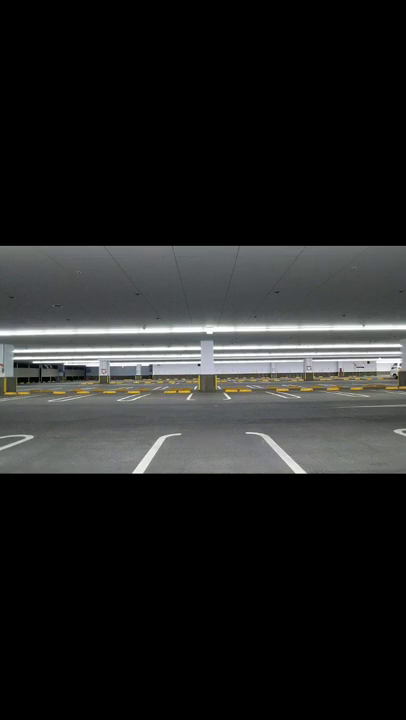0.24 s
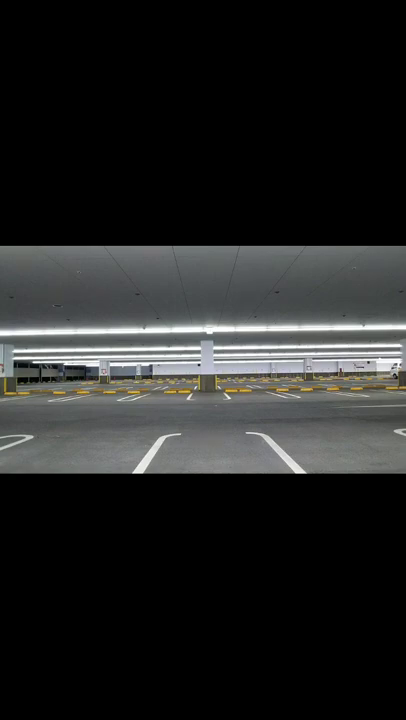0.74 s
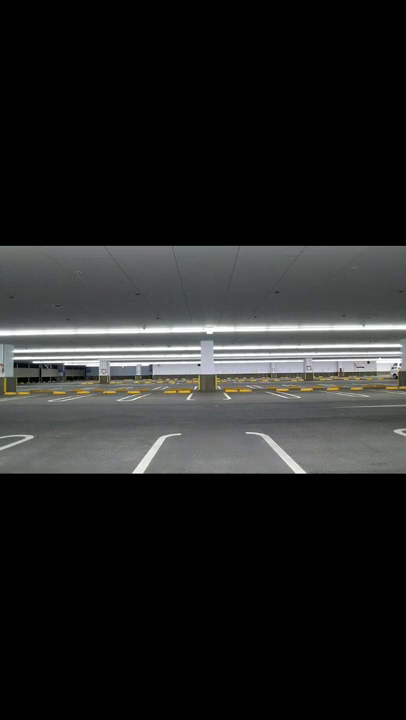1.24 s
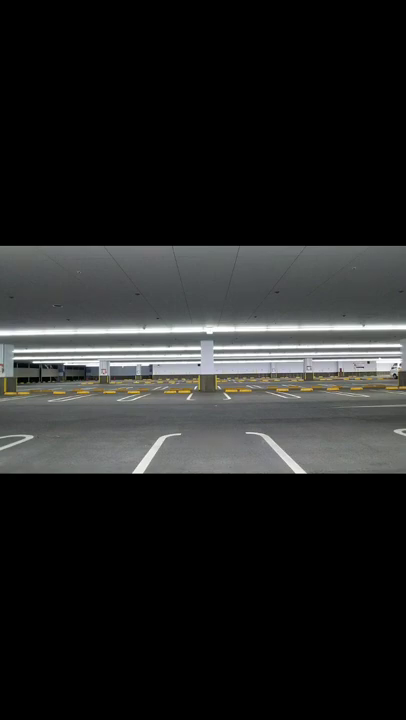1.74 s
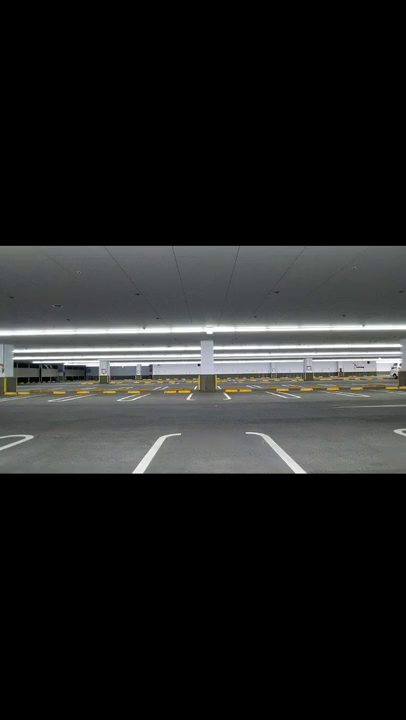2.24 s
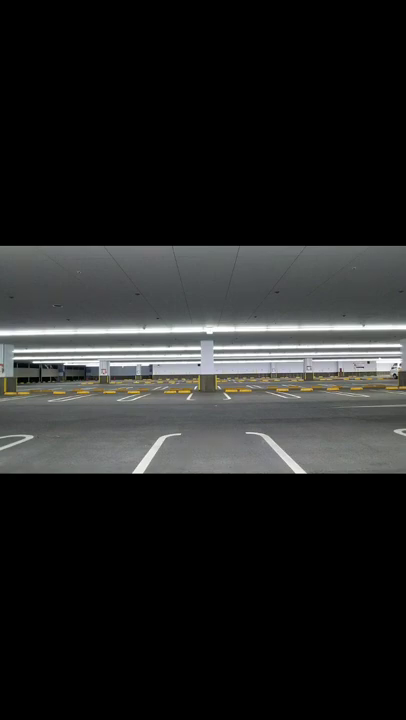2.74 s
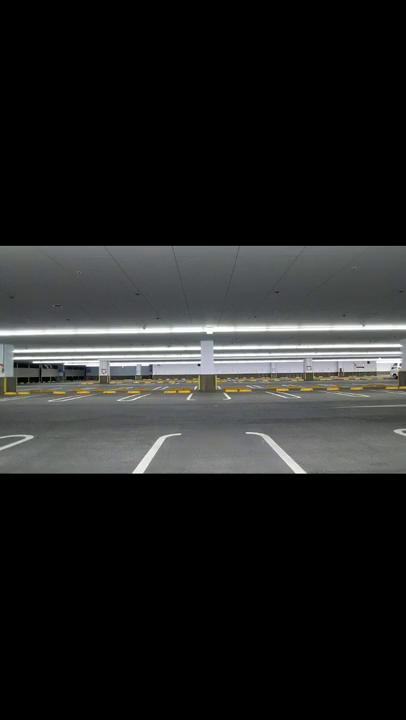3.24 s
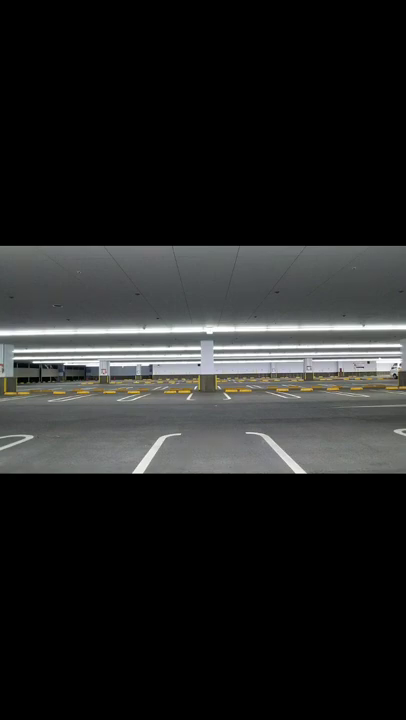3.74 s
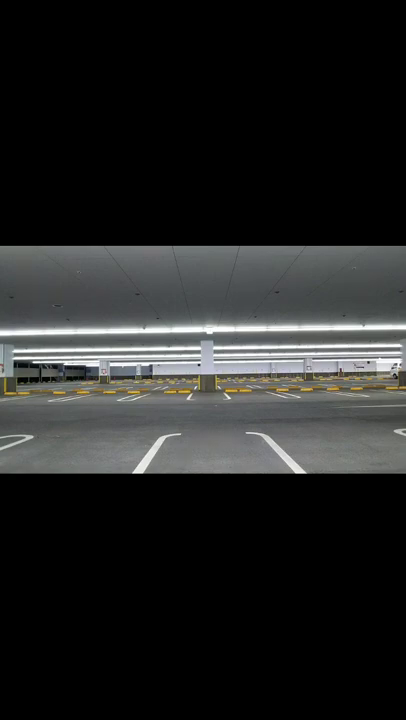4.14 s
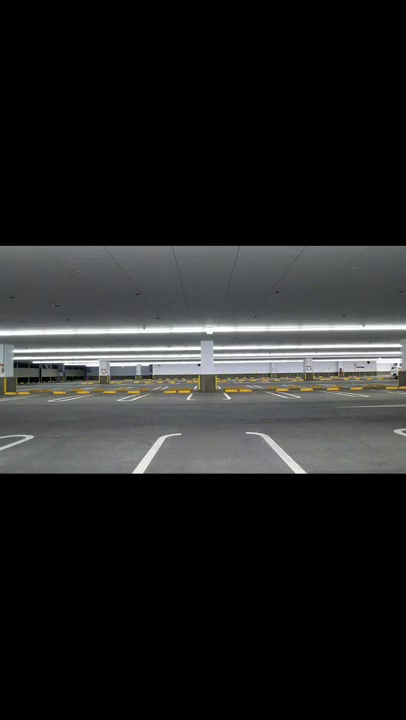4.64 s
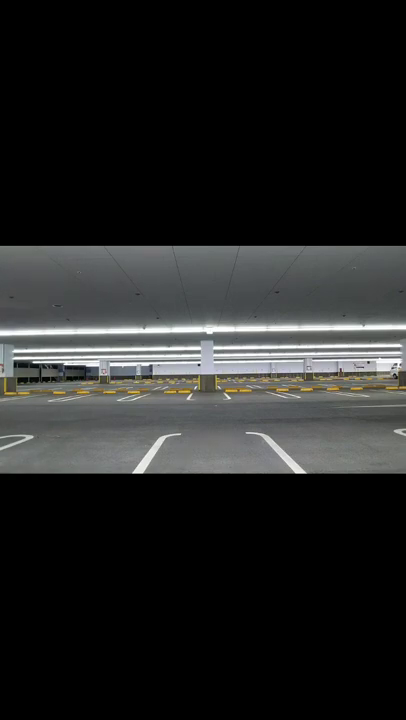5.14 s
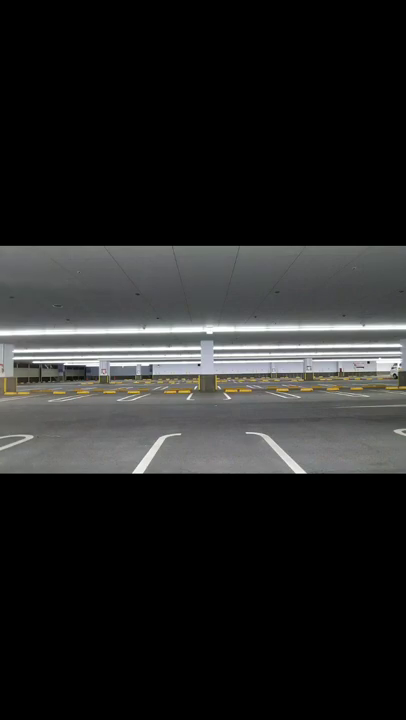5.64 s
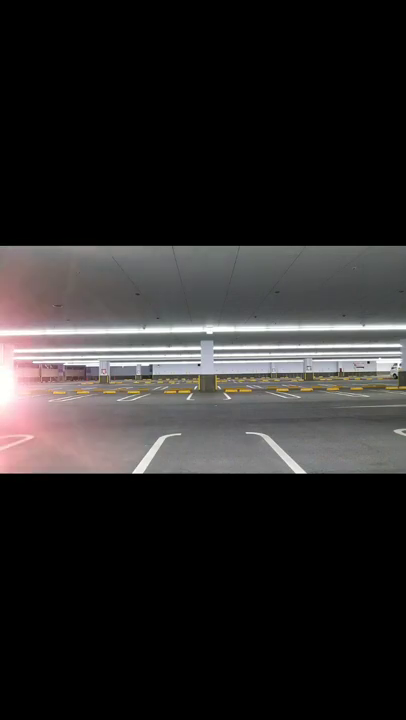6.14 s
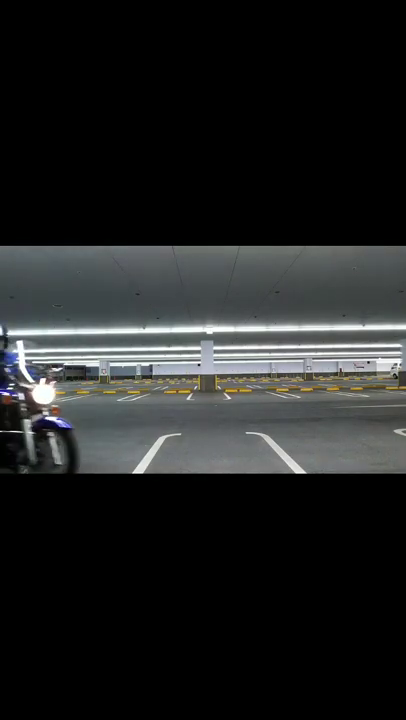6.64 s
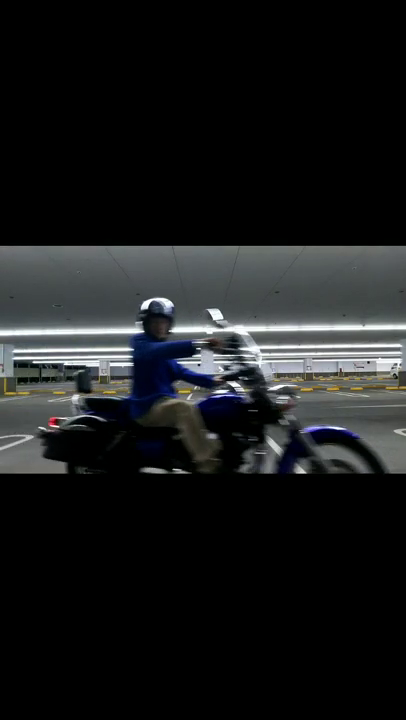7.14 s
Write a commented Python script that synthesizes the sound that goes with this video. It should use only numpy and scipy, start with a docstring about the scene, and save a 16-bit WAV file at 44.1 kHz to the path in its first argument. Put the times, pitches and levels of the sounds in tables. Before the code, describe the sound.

A loud V-twin motorcycle with an open exhaust revs and echoes through a concrete parking garage, then rolls close past with heavy uneven thumps.

```python
"""A V-twin motorcycle with an open exhaust rounds a concrete parking garage, revs hard twice and rolls close by.
Uneven firing pulses and puffs of gas ring its pipes and the hall: a deep boom with a bark on top.
Single engine orders in the boom are drawn to set levels for a stretch; single resonances bloom in rough bands.
Filtered noise beating with the firings makes the rasp and hiss; a gear whines with the crank.
Loose metal chatters, the brake disc sings faintly, and low air noise lies behind it all."""
import sys
import numpy as np
from scipy import signal
from scipy.fft import rfft, irfft, next_fast_len
from scipy.io import wavfile
from scipy.ndimage import uniform_filter1d, minimum_filter1d, map_coordinates

SR = 44100
rng = np.random.default_rng(int(sys.argv[2]) if len(sys.argv) > 2 else 0)


def store_pcm(level_fs):
    """Save levels as 16-bit WAV."""
    pcm = np.round(np.clip(level_fs, -1, 1) * 32767).astype(np.int16)
    wavfile.write(sys.argv[1], SR, np.atleast_2d(pcm).T)


N = 326334
TIME = np.arange(N) / SR

# the bike's round past the pillars, near and far:
# (t/s, direct sound over hall/dB, boom gain/dB, bark gain/dB, rasp gain/dB, hiss gain/dB)
RIDE_PAST_PILLARS = [(0, -6.5, -1.6, -0.5, 1, 1), (.5, -16, -0.5, 0.5, 4.5, 1.1),
                     (1.0, -14.5, -0.2, -2.5, 3, 2.5), (1.45, -6, -5, -2, 3, 1.4),
                     (2.35, -4, -3, -2.5, -0.5, 1), (3.1, -6.5, -3, -3, 1.5, 2),
                     (3.7, -10, -0.1, 0, 0.5, 4.5), (3.98, -1.5, 3, 4, 3, 5.5), (4.16, -2, 2, 2, 1.5, 5),
                     (4.45, -3.5, -2, -2, -2.5, -2.5), (5.0, -10, 2.5, 2.5, 1.5, 1),
                     (6.05, -4.5, 1.5, 0, 1, 1.5), (6.42, -5.5, 3, 0.5, 4.5, 5.5), (6.5, 10.5, 3, 2, 5, 6),
                     (6.72, 11.5, 1.5, 4, 6.5, 8), (6.88, 8, 4, 6, 8.5, 8), (7.15, 9, 3.5, 5.5, 0.5, 3),
                     (7.4, 5.5, 2.5, 4, -1.5, 1)]


def speed():
    """Four-stroke cycles per second, rounded by the flywheel."""
    # engine speed before the flywheel rounds it: (t/s, rate/cycles per s)
    speed_points = [(0, 18.38), (0.42, 17.77), (0.7, 20.28), (0.97, 22.5), (1.25, 23.44), (1.49, 17.56),
                    (1.78, 12.31), (2.1, 12.31), (2.45, 12.9), (2.63, 12.04), (2.85, 13.24), (3.15, 12.42),
                    (3.45, 13.22), (3.66, 13.35), (3.88, 18.56), (4.1, 23.03), (4.28, 22.64), (4.45, 20.58),
                    (4.9, 17.9), (5.16, 16.85), (5.5, 17.93), (5.72, 18.88), (5.9, 19.29), (6.4, 15.17),
                    (6.63, 13.45), (7, 13.08), (7.4, 12.52)]
    return smooth(curves(speed_points)[0], seconds=0.14)


def firings(cycle, bank, jitter):
    """One row of pulses for each cylinder; the second follows at a share `bank` of the cycle, jitter in s."""
    # firing strength varies from pulse to pulse, less as the bike rolls close: (t/s, scatter/dB)
    strength_scatter = [(6, 1.7), (6.5, .5)]
    turns = np.arange(np.ceil(cycle[0]), cycle[-1])
    pulses = np.zeros((2, N))
    scatter_db = curves(strength_scatter)[0]
    for row, offset, size_db in zip(pulses, (0, bank), (0 * TIME, second_cylinder())):
        chance = rng.standard_normal((len(turns), 2))
        at = np.interp(turns + offset, cycle, TIME, right=2 * N / SR) + jitter * chance[:, 0]
        i = np.round(at * SR).astype(int)
        keep = (i >= 0) & (i < N)
        row[i[keep]] += amp(size_db[i[keep]] + scatter_db[i[keep]] * chance[keep, 1])
    return pulses


def second_cylinder():
    """Its dB against the first: slightly stronger at top revs, weaker in misfires."""
    # the second cylinder fires weakly at a crawl: (from t/s, to t/s, level/dB)
    misfires = [(6.357, 6.74, -8), (6.757, 6.85, -10.5), (6.93, 7.5, -3)]
    top_revs = np.maximum(speed() - 23.05, 0)  # cycles per second above this
    return -2.5 + 0.5 * top_revs + sum(db * held(start, end) for start, end, db in misfires)


def exhaust(cycle, cylinders):
    """Pulses and gas noise ring the pipe: a deep boom and a bark that grows with the throttle."""
    # the exhaust pipe's colour as it reaches the hall: (f/Hz, level/dB)
    pipe_colour = [(24, -67), (40, -25.5), (92, -8.5), (130, -5.5), (212, -4), (269, -6), (307, -11),
                   (407, -12.5), (500, -18.5), (620, -20), (857, -22), (1220, -35.5), (1400, -36),
                   (1820, -70.5), (3080, -120)]
    near_db, boom_gain_db, bark_gain_db, _, _ = curves(RIDE_PAST_PILLARS)
    pulses = cylinders.sum(0)
    gas = split(puffs(pulses, decay=0.0079, base=0.4), edge_hz=247)[1]
    blast = headers(pulses, edge_hz=49) + amp(-4.5) * gas
    far = ring(blast, pipe_colour)
    far = far + amp(1.5) * resonance(far, centre_hz=133.6, width_hz=10.0)  # floor-to-ceiling mode
    heard = steady(garage(far), seconds=0.22)
    heard[0] += amp(near_db) * thumps(cylinders, gas_db=-1)
    boom, bark = split(heard, edge_hz=270.0)
    boom = engine_orders(steady(boom, seconds=0.091), cycle)
    boom_db = boom_gain_db + loudness(coasting_db=-14.5, doubling_db=3.23, throttle_db=2)
    bark_db = bark_gain_db + loudness(coasting_db=-28, doubling_db=5.9, throttle_db=6.9)
    return amp(boom_db) * steady(boom, seconds=0.31) + amp(bark_db) * steady(bark, seconds=0.47)


def headers(pulses, edge_hz):
    """The pipes radiate almost nothing below their lowest resonance."""
    return unit(filtered(pulses, lambda hz: hz ** 6 / (hz ** 6 + edge_hz ** 6)))


def puffs(pulses, decay, base):
    """Turbulent gas: noise that flares with each firing and dies away, decay in s."""
    flare = signal.lfilter([1], [1, -np.exp(-1 / (decay * SR))], pulses)
    return unit((flare + base) * rng.standard_normal(N))


def thumps(cylinders, gas_db):
    """The direct sound: a round, ringing thump and a short puff from each pipe, and their first echoes."""
    # each cylinder's own pipe, heard straight from the muffler: (f/Hz, level/dB)
    front_pipe = [(30, -61), (55, -17.5), (85, -4.5), (125, 6), (190, 2), (235, -1.5), (290, -14.5),
                  (400, -14.5), (540, -16), (700, -28.5), (1050, -32.5), (1400, -57), (3000, -74)]
    rear_pipe = [(30, -59), (55, -11), (85, 1), (120, 6), (160, -2.5), (205, -1), (270, 6), (320, -10.5),
                 (410, -11), (560, -18), (700, -31.5), (1050, -39), (1400, -47), (3000, -66)]
    # the ceiling and the nearest pillars repeat each close beat: (delay/s, level/dB)
    echoes = [(.0052, -2.5), (0.017, -12.5), (.037, -14)]
    high_pass = signal.butter(4, 380, "high", fs=SR, output="sos")
    x = 0
    for pulses, pipe in zip(cylinders, (front_pipe, rear_pipe)):
        gas = signal.sosfilt(high_pass, puffs(pulses, decay=0.009, base=0.03))
        x = x + ring(pulses + amp(gas_db) * pulses.std() * gas, pipe)
    x = x + amp(-2) * resonance(x, centre_hz=185, width_hz=28)  # the muffler's can
    return unit(x + sum(amp(db) * np.interp(TIME - delay, TIME, x) for delay, db in echoes))


def engine_orders(boom, cycle):
    """Far away at a steady speed the diffuse boom drops and single multiples of the cycle rate stand out."""
    # one order is drawn to this level for a stretch; most rows swell, very low ones thin it out:
    # (middle t/s, length/s, order/waves per cycle, level against the boom/dB)
    order_lines = [(0.051, 0.27, 7, -11), (0.162, 0.88, 6, -11), (0.202, 0.96, 5, -11.5),
                   (0.242, 1.23, 9, -7), (0.286, 0.52, 8, -6.5), (0.35, 1.1, 12, -11), (0.474, 0.11, 8, -7),
                   (0.654, 0.073, 8, -3), (0.857, 0.5, 5, -10), (0.928, 0.3, 10, -6),
                   (0.965, 0.28, 12, -4.5), (1.008, 0.22, 7, -5), (1.046, 0.31, 16, -17.5),
                   (1.05, 0.7, 8, -6), (1.217, 0.43, 10, -7.5), (1.288, 0.18, 5, -7),
                   (1.976, 0.16, 17, -5.5), (1.995, 0.78, 11, -12.5), (2.24, 1.94, 15, -7.5),
                   (2.457, 1.6, 19, -10), (2.503, 1.04, 14, -5.5), (2.52, 0.59, 12, -11),
                   (2.527, 0.7, 11, -9), (2.739, 0.63, 9, -10), (2.845, 0.49, 17, -16),
                   (3.185, 3.5, 5, -15.5), (3.324, 0.32, 11, -7.5), (3.327, 0.44, 15, -8),
                   (3.398, 0.1, 14, -19.5), (3.581, 0.17, 14, -6), (3.652, 0.29, 9, -5.5),
                   (3.849, 0.14, 7, -3), (4.014, 0.81, 8, -8), (4.127, 0.26, 10, -4), (4.13, 0.48, 12, -9),
                   (4.172, 0.23, 18, -15.5), (4.277, 0.31, 6, 0.5), (4.776, 1.1, 5, -14),
                   (4.79, 0.91, 9, -10), (4.802, 0.69, 23, -19), (4.84, 0.86, 8, -5.5),
                   (5.274, 1.8, 12, -6), (5.303, 0.87, 9, -5.5), (5.37, 1.2, 19, -18.5),
                   (5.379, 0.42, 8, -2), (5.516, 0.94, 5, -11.5), (5.684, 0.21, 9, -5),
                   (5.834, 0.5, 8, -5.5), (5.887, 0.42, 12, -8.5), (5.905, 0.27, 7, -6.5),
                   (6.04, 0.26, 12, -4.5), (6.095, 0.54, 31, -29), (6.1, 0.91, 10, -30),
                   (6.087, 0.57, 15, -14), (6.256, 0.49, 12, -5), (6.275, 0.38, 14, -5),
                   (6.437, 0.29, 28, -20), (6.537, 0.36, 13, -23), (6.56, 0.9, 16, -10.5),
                   (6.589, 0.67, 9, 2), (6.705, 0.62, 15, 5.5), (6.935, 1.34, 5, -7)]
    near_share = 0.1  # how far an order is drawn to its level close to the bike, 0-1
    wash_db = -5.5  # drop of the diffuse boom under the orders, far away at a steady speed
    sweep = 24  # change of speed that halves this drop, cycles per second, per second
    crank_waver = 0.009  # uneven running in cycles; it roughens the high orders
    acceleration = np.gradient(speed()) * SR
    # in a fast sweep the diffuse boom stays full; at a steady speed it drops under the orders
    settled = 1 / (1 + (acceleration / sweep) ** 2)
    far = 1 / (1 + amp(curves(RIDE_PAST_PILLARS)[0] - 5) ** 2)
    mid = boom[0] * amp(wash_db * settled * far)
    share = near_share + (1 - near_share) * far  # close by, the direct thumps take over
    crank = cycle + crank_waver * far * wobble(45)
    for s, length, order, db in order_lines:
        span = np.flatnonzero(np.abs(TIME - s) < length / 2)
        lobe = np.cos(np.pi * (TIME[span] - s) / length)
        wave = lobe * np.exp(2j * np.pi * order * crank[span])
        # what the boom already holds of this order
        line = 2 * np.sum(mid[span] * wave.conj()) / np.sum(lobe ** 2)
        wanted = np.sqrt(2) * amp(db) * np.exp(1j * np.angle(line))
        mid[span] += share[span] * np.real((wanted - line) * wave)
    return np.array([mid, boom[1]])


def garage(x, count=8):
    """Diffuse (mid, side) answer of the hall; each stretch of the ride has its own echoes."""
    # how long the concrete hall rings: (f/Hz, t60/s)
    hall_decay = [(60, 2.7), (140, 4.5), (400, 1.1), (2000, 0.66), (10000, 0.14)]
    out = np.zeros((2, N + 3 * SR))
    hop = N // (count - 1) + 1
    x = np.pad(x, (SR, 0), mode="reflect")  # the hall is already ringing
    hz, t, _ = signal.stft(np.zeros(SR), SR, nperseg=512)
    dying = amp(-60 * t / along(hall_decay, hz)[:, None])
    for centre in range(SR - hop, SR + N + hop, hop):
        a, b = max(centre - hop, 0), min(centre + hop, len(x))
        noise = signal.stft(rng.standard_normal((2, SR)), SR, nperseg=512)[2]
        tail = signal.istft(noise * dying, SR, nperseg=512)[1]
        fade = np.cos(np.pi / 2 * (np.arange(a, b) - centre) / hop)
        echo = signal.fftconvolve((x[a:b] * fade)[None], tail / np.linalg.norm(tail[0]), axes=1)
        out[:, a:a + echo.shape[1]] += echo
    return out[:, SR:SR + N]


def loudness(coasting_db, doubling_db, throttle_db):
    """A layer's dB: coasting at 16 cycles a second, plus a rise per doubling of speed and at full throttle."""
    # twists of the throttle: (starts to open t/s, starts to close t/s, opening/0-1)
    twists = [(-0.2, 1.222, 0.2), (2.26, 2.548, 0), (3.825, 4.21, 0), (4.502, 4.737, 0.46),
              (4.91, 5.367, 0.08), (5.586, 5.86, 0.24), (6.78, 7.5, 0.29)]
    throttle = sum(opening * held(start, end) for start, end, opening in twists)
    return coasting_db + doubling_db * np.log2(speed() / 16) + throttle_db * smooth(throttle, seconds=0.016)


def held(start, end):
    """An envelope that opens, holds and closes at the pace of the wrist."""
    open_s, close_s = 0.065, 0.15  # the wrist's travel
    return np.clip((TIME - start) / open_s, 0, 1) * np.clip(1 - (TIME - end) / close_s, 0, 1)


def blooms(pulses):
    """Puffs of gas ring single resonances, each only along part of the way."""
    # rough bands that sing out for a stretch of the ride:
    # (from t/s, to t/s, centre f/Hz, width of one pass/Hz, level/dB)
    singing_bands = [(-.2, 0.423, 857, 70.6, -31.5), (0.11, .46, 455, 74, -27.5), (.58, 1.06, 462, 35, -29),
                     (0.51, 1.1, 990, 278, -36), (0.352, 1.1, 1630, 520, -42.5),
                     (1.4, 2.11, 2400, 450, -52), (2.29, 3.1, 609, 130, -42.5), (3.15, 3.9, 660, 300, -41),
                     (3.927, 4.2, 540, 188, -30), (3.96, 4.217, 990, 190, -32.5),
                     (3.997, 4.117, 2300, 1600, -41)]
    gas = np.array([puffs(pulses, decay=0.012, base=0.52), rng.standard_normal(N)])
    out = np.zeros((2, N))
    for start, end, hz, width, db in singing_bands:
        envelope = held(start, end)
        span = np.flatnonzero(envelope)
        mode = signal.iirpeak(hz, hz / width, SR)
        band = signal.lfilter(*mode, signal.lfilter(*mode, gas[:, span]))
        out[:, span] += amp(db) * envelope[span] * steady(band, seconds=0.043)
    return out


def machine(cycle, pulses):
    """Valve gear, chain and escaping gas: rasp and hiss that beat with the firings, more clearly when near."""
    # colour of the engine's metal and gas noise: (f/Hz, level/dB)
    metal_colour = [(650, -3), (1100, 2.5), (1240, -3), (1580, -1.5), (2060, -6), (2370, -5.5),
                    (3120, -8.5), (4630, -5), (5790, -8), (7240, -9), (7960, -16), (10500, -23.5),
                    (12300, -36), (13300, -35.5), (14000, -36.5)]
    near_db, _, _, rasp_gain_db, hiss_gain_db = curves(RIDE_PAST_PILLARS)
    near = amp(np.minimum(near_db, 1))
    rasp_db = rasp_gain_db + loudness(coasting_db=-39.5, doubling_db=1.8, throttle_db=7.4)
    hiss_db = hiss_gain_db + loudness(coasting_db=-50, doubling_db=3.6, throttle_db=6.7)
    heard = rng.standard_normal((2, N))  # the hall washes out the beat
    heard[0] += near * amp(-4.0) * puffs(pulses, decay=0.0057, base=0.052) * amp(2.5 * wobble(60))
    heard = heard + amp(-8.5) * resonance(heard, centre_hz=7300, width_hz=220)  # the chain's ring
    metal = filtered(heard, lambda hz: amp(along(metal_colour, hz)) * ripple(hz, spacing_hz=60, depth_db=1.4))
    rasp, hiss = split(metal, edge_hz=3330)
    hiss, fizz = split(hiss, edge_hz=3340)
    close_fizz = near * amp(-5.0) * split(fizz, edge_hz=9100)[1]
    hiss = hiss + fizz * amp(0.62 * wobble(17) - 5.5) + close_fizz
    # the rasp swells once a cycle and flickers at random
    grain_db = 0.4 * np.cos(2 * np.pi * cycle) + 0.55 * wobble(10) + 0.4 * wobble(130)
    return amp(rasp_db + grain_db) * steady(rasp, seconds=0.74) + amp(hiss_db) * steady(hiss, seconds=0.17)


def ripple(hz, spacing_hz, depth_db):
    """A fixed, random unevenness across the spectrum that makes the noise slightly patchy."""
    knots = rng.standard_normal(4096)
    return amp(depth_db * np.interp(hz / spacing_hz, np.arange(len(knots)), knots))


def gear(cycle):
    """The tooth-mesh tones follow the crank; random phase wander roughens each into a band."""
    # one mesh sings under load, a lower one on the overrun, level before the spread:
    # (from t/s, to t/s, teeth per cycle, level/dB)
    whines = [(4.652, 5.894, 47, -43.5), (5.875, 6.602, 34, -39.5)]
    swing, turn = wobble(110), wobble(110)
    tone = 0
    for start, end, teeth, db in whines:
        tone = tone + amp(db) * held(start, end) * np.sin(2 * np.pi * teeth * cycle + 1.5 * turn)
    spread = np.sqrt(2) * np.array([np.cos(swing), np.sin(swing)])  # drifts between mid and side
    return np.sqrt(2) * tone * spread


def chatter(decay):
    """Short metallic rattles of loose parts: ringing noise that starts abruptly, decay in s."""
    # loose metal parts chatter as the bike passes: (t/s, starting level/dB)
    rattles = [(7.169, -32), (7.25, -40), (7.328, -39.5)]
    metal = resonance(rng.standard_normal((2, N)), centre_hz=2680, width_hz=470)
    metal = unit(resonance(metal, centre_hz=2640, width_hz=720))
    return metal * sum(amp(db) * (TIME > s) * np.exp(-np.abs(TIME - s) / decay) for s, db in rattles)


def brake(pitch_hz, width_hz):
    """A faint, very high singing of the brake disc: a narrow band of noise."""
    # touches of the brake: (start t/s, length/s, peak level/dB)
    touches = [(1.598, 0.22, -71), (6.655, 0.28, -72.5), (6.995, 0.53, -67)]
    noise = rng.standard_normal((2, N))
    song = unit(filtered(noise, lambda hz: np.exp(-((hz - pitch_hz) / width_hz) ** 2)))
    envelope = 0
    for s, length, db in touches:
        arch = np.sin(np.pi * np.clip((TIME - s) / length, 0, 1)).clip(0)
        envelope = envelope + amp(db) * np.sqrt(arch)
    return song * envelope


def rumble(level_db):
    """The low, drifting air noise of the building."""
    # colour of the garage's air: (f/Hz, level/dB)
    air_colour = [(15, 11), (40, 4), (100, -12), (400, -37), (2000, -120)]
    air = unit(filtered(rng.standard_normal((2, N)), lambda hz: amp(along(air_colour, hz))))
    return air * amp(level_db + 2.7 * wobble(4))


def microphones(pair):
    """Mid and side become left and right; the lag between them closes as the bike draws level."""
    # gain of the diffuse side: (f/Hz, side over mid/dB)
    side_width = [(60, -20), (150, -19), (300, -13), (600, -9), (1200, -6), (2500, -1), (5000, 1)]
    # balance of the two microphones: (f/Hz, left minus right/dB)
    lean = [(60, 8.5), (110, 6), (200, 3.5), (370, 3), (670, 1), (1230, -0.5), (2240, 0.5), (4100, -5),
            (7500, -7), (13700, -2)]
    # phase by which the left microphone port trails: (f/Hz, phase/rad)
    port_phase = [(60, 2.4), (130, 0.99), (260, 0.5), (600, 0.11)]
    lag_ms = 0.33  # left behind right well before the bike draws level
    mid, side = pair[0], filtered(pair[1], lambda hz: amp(along(side_width, hz)))
    half = np.array([[.5], [-.5]])
    ports = lambda hz: amp(half * along(lean, hz)) * np.exp(-1j * half * along(port_phase, hz))
    left, right = filtered(np.array([mid + side, mid - side]), ports)
    late = TIME - lag_ms * bearing() / 1000
    return np.array([map_coordinates(left, [late * SR], mode="nearest"), right])


def bearing():
    """1 while the bike is off to the side, 0 as it draws level, negative beyond."""
    level_s, pass_s = 7.25, 0.43  # when it draws level, how long that takes
    return np.tanh((level_s - TIME) / pass_s)


def amp(db):
    """Decibels to gain."""
    return 10 ** (np.asarray(db) / 20)


def unit(x):
    """Scale to rms 1."""
    return x / np.sqrt(np.mean(x ** 2) + 1e-20)


def along(points, hz):
    """(f/Hz, value) points read on a log axis."""
    f, v = np.transpose(points)
    return np.interp(np.log(hz + 1), np.log(f + 1), v)


def curves(rows):
    """One value per sample for each column after the time."""
    s, *cols = np.transpose(rows)
    return [np.interp(TIME, s, c) for c in cols]


def wobble(rate):
    """A smooth random curve, rate knots a second."""
    return map_coordinates(rng.standard_normal(int(N * rate / SR) + 4), [TIME * rate / SR])


def smooth(x, seconds):
    """Triangular running mean."""
    size = max(int(seconds * SR), 1)
    return uniform_filter1d(uniform_filter1d(x, size), size)


def steady(x, seconds):
    """A (mid, side) pair with its mid held near rms 1; faster beats stay."""
    return x / np.sqrt(np.abs(smooth(x[0] ** 2, seconds)) + 1e-12)


def filtered(x, response):
    """x times a response of frequency."""
    m = next_fast_len(N + 8192, True)
    return irfft(rfft(x, m) * response(np.fft.rfftfreq(m, 1 / SR)), m)[..., :N]


def split(x, edge_hz):
    """The parts of x below and above an edge."""
    low = signal.sosfiltfilt(signal.butter(5, edge_hz, fs=SR, output="sos"), x)
    return low, x - low


def ring(x, spectrum, size=8192):
    """Causal colour: each pulse rings after its onset (a minimum-phase response)."""
    gain_db = np.maximum(along(spectrum, np.fft.rfftfreq(size, 1 / SR)), -75)
    cepstrum = irfft(np.log(amp(gain_db)))
    cepstrum[1:size // 2] *= 2
    cepstrum[size // 2 + 1:] = 0
    return signal.oaconvolve(x, irfft(np.exp(rfft(cepstrum))))[:N]


def resonance(x, centre_hz, width_hz):
    """One causal mode with gain 1 at its centre."""
    return filtered(x, lambda f: 1j * f * width_hz / (centre_hz ** 2 - f * f + 1j * f * width_hz))


def scene():
    """The crank drives the engine's layers; chatter, brake and air noise join them at the microphones."""
    cycle = np.cumsum(speed()) / SR
    cycle -= np.interp(7.0855, TIME, cycle)  # the first cylinder's beat falls at this second
    cylinders = firings(cycle, bank=5 / 12, jitter=0.00012)
    pulses = cylinders.sum(0)
    bike = exhaust(cycle, cylinders) + blooms(pulses) + machine(cycle, pulses) + gear(cycle)
    bike = bike + chatter(decay=0.014) + brake(pitch_hz=13450, width_hz=380)
    return microphones(bike + rumble(level_db=-74.5))


def record(dry):
    """A limiter turns down the loudest beats and a band limit removes the extreme treble."""
    needed = np.minimum(1, .88 / (np.abs(dry).max(0) + 1e-9))
    gain = smooth(minimum_filter1d(needed, size=SR // 40), seconds=0.008)
    return filtered(dry * gain, lambda hz: hz < 14000)


dry = scene()
out = record(dry)
store_pcm(out)
```